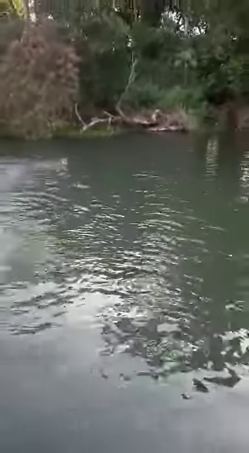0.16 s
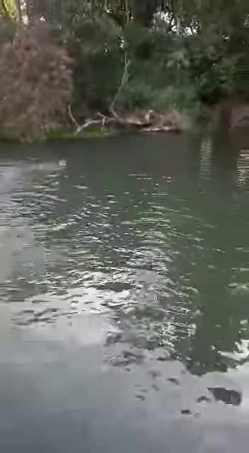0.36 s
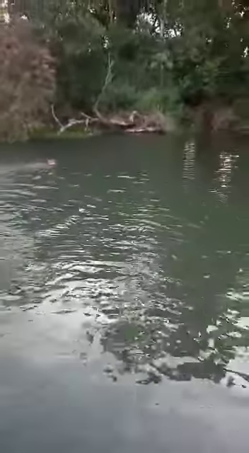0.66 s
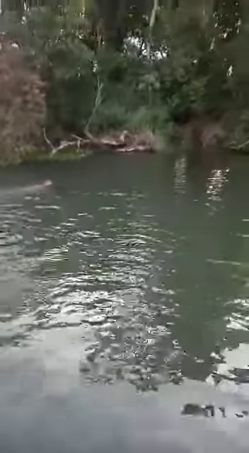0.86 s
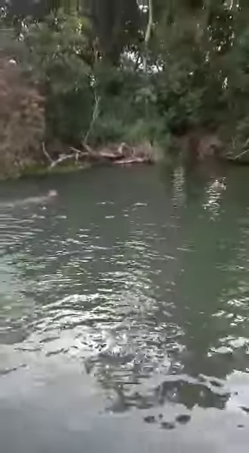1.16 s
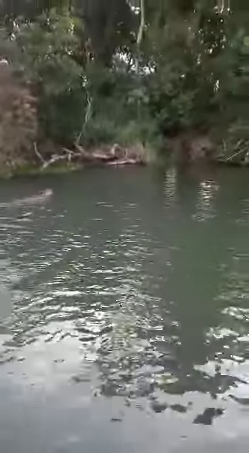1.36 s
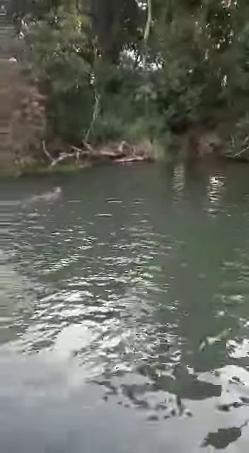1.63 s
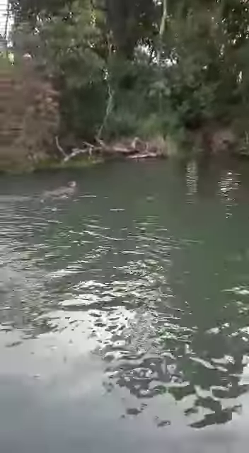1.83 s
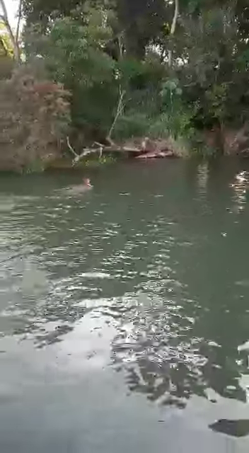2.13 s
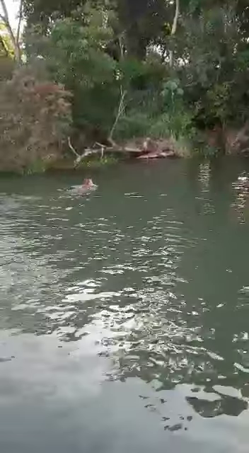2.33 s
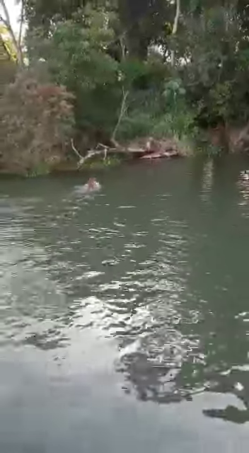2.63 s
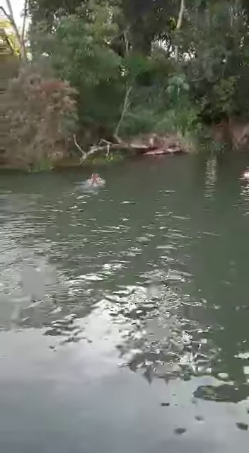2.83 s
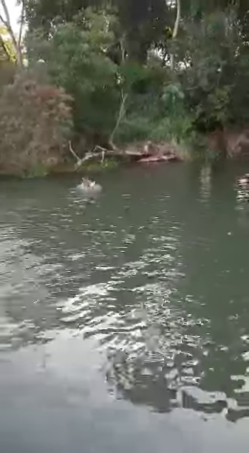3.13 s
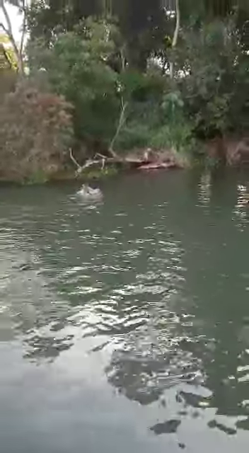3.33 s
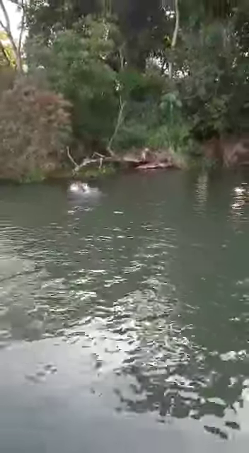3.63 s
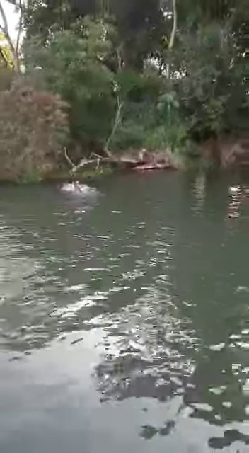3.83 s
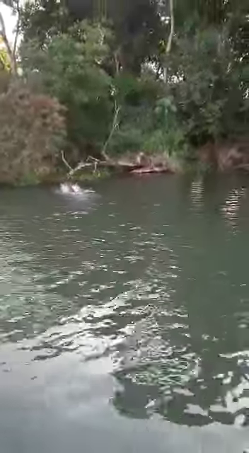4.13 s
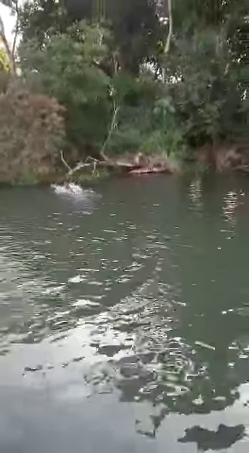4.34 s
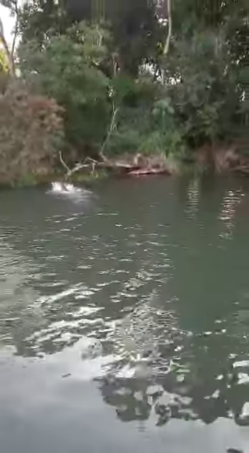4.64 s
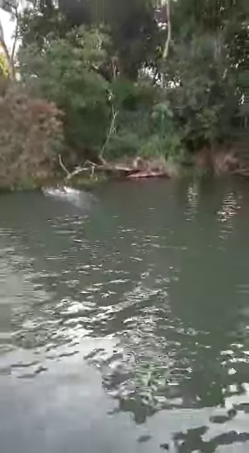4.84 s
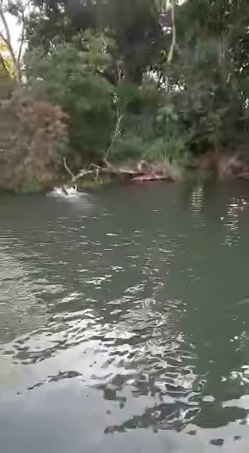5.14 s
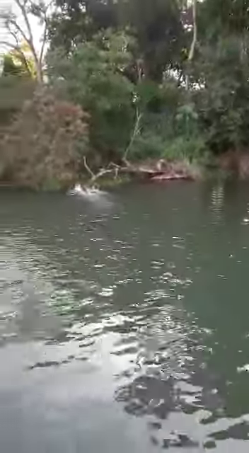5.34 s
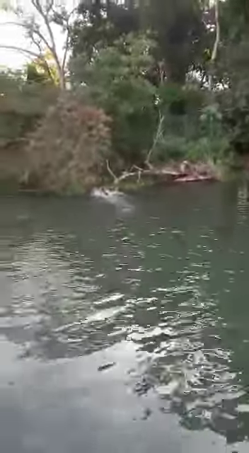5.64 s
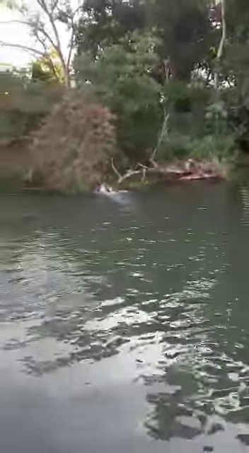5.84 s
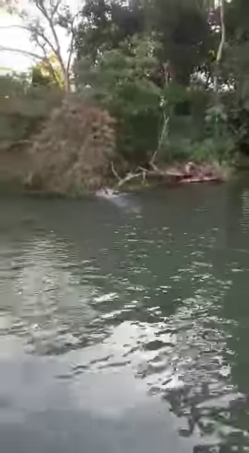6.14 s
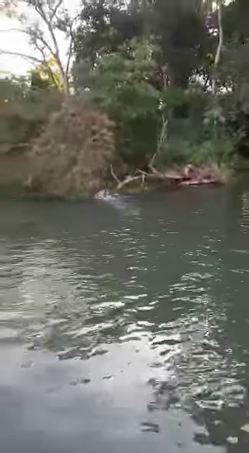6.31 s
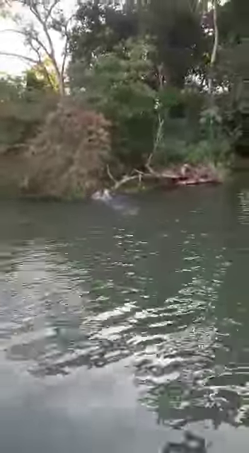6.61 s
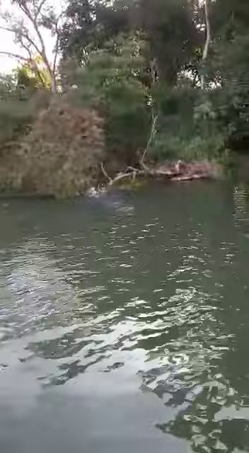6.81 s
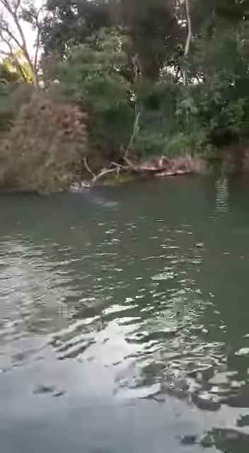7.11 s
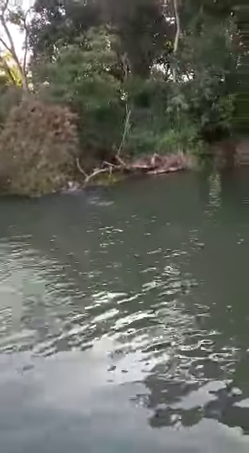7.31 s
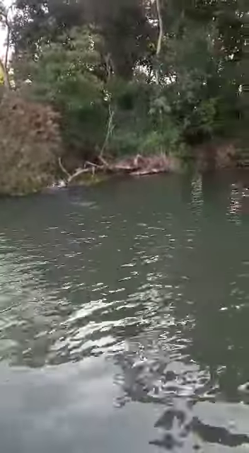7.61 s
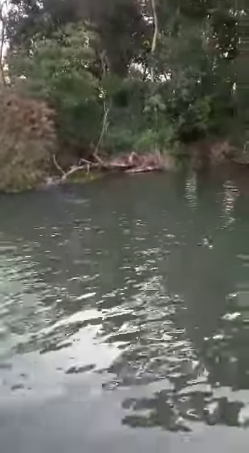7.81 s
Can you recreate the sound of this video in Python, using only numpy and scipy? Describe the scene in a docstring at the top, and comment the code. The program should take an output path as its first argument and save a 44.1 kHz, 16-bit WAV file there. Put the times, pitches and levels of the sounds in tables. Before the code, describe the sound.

Right at the start, a close, hollow knock rings on a boat hull. A second follows at about 0.5 seconds and bounces a few times; these two are the loudest sounds. From about 1 to 2 seconds, wind puffs against the microphone with low rumbles and soft thumps, over a few faint splashes and bubble plops. Around 2.3 seconds, a swimmer some way off begins churning the river. The splashing builds until about 4 seconds and then holds at a modest level to the end near 8 seconds: uneven strokes, small slaps, round gurgles, snapping drops and a steady fizz of spray. Wind thumps return near 2.4 seconds, more lightly around 4.5 and 5.5, and again from 7.4 seconds. Behind everything lie a very faint, high, even insect drone and a soft outdoor hiss.

```python
"""A river bank, with a swimmer some way off churning the water into gurgles, bubbles and fizz.
Each stroke shoves the water, and each slap traps a bubble of air that rings like a tiny bell.
Near the start, two knocks set a hollow hull ringing. Wind puffs at the opening of a small
microphone and makes it rumble, while insects sing high up over a faint hush."""
import sys
import numpy as np
from scipy import signal
from scipy.fft import rfft, irfft
from scipy.io import wavfile
from scipy.ndimage import uniform_filter1d

SR = 44100
rng = np.random.default_rng(int(sys.argv[2]) if len(sys.argv) > 2 else 0)


def store_pcm(level_fs):
    """Save levels as 16-bit WAV."""
    pcm = np.round(np.clip(level_fs, -1, 1) * 32767).astype(np.int16)
    wavfile.write(sys.argv[1], SR, np.atleast_2d(pcm).T)


N = 351344

# The churn builds as the swimmer gets going.
# Each row: time in seconds, fizz level in dB, extra gurgle in dB, extra spray in dB.
CHURN = [(0.4, -94, 8, 18), (0.7, -96.5, 7, -15), (1.95, -94.5, 10.5, -12), (2.24, -64, -8, -13),
         (2.32, -63.5, 0.5, -11), (2.6, -59, 3, -22.5), (3.1, -58.5, 4, -14.5), (3.6, -55, 6.5, -5.5),
         (4.1, -54, 4, -2.5), (5.0, -55, 6.5, -0.5), (5.9, -54.5, 4, -2), (6.4, -57.5, 5.5, -1.5),
         (6.7, -59, 9.5, -4), (7.0, -56, 3, -4), (7.96, -56, 2.5, -2)]
# The tone colour of splashing water. Each row: frequency in Hz, level in dB.
WATER_COLOUR = [(150, -27), (297, -16.5), (450, 4), (755, -4), (928, 1), (1160, -10), (1380, -8.5),
                (1560, -16.5), (1780, -11.5), (1960, -14), (2480, -7), (2950, -18), (3500, -26.5),
                (4250, -26.5), (4750, -17.5), (6500, -21.5), (7200, -35), (8000, -38.5), (10200, -32),
                (12000, -41.5), (15500, -51)]
# Swimming strokes. Each row: start in seconds, slosh level in dB, length in seconds, churn swell in dB.
STROKES = [(2.302, -93, 0.048, 7), (2.377, -59, 0.14, 5.5), (2.602, -68.5, 0.041, 4),
           (2.709, -88, 0.073, 2), (2.812, -58, 0.095, 2), (3.13, -62.5, 0.2, 2), (3.456, -67, 0.21, 1.5),
           (3.692, -63.5, 0.13, 2), (3.953, -64, 0.33, 3), (4.461, -57.5, 0.28, 2), (4.871, -80, 0.083, 3),
           (4.981, -54.5, 0.14, 3.5), (5.297, -62, 0.12, 3), (5.426, -54.5, 0.15, 4), (5.734, -57, 0.32, 3),
           (6.212, -59.5, 0.083, 2), (6.36, -61, 0.09, 1.5), (6.552, -56.5, 0.22, 1),
           (6.803, -59, 0.19, 0.5), (7.016, -56.5, 0.29, 2), (7.41, -56.5, 0.25, 3),
           (7.776, -57.5, 0.26, 0.5)]
# Spray thrown up by kicks. Each row: start in seconds, length in seconds, spray boost in dB.
KICKS = [(2.502, 0.066, 11.5), (2.614, 0.032, 14), (2.666, 0.034, 13.5), (2.85, 0.14, 7),
         (6.007, 0.025, 2.5), (6.707, 0.081, 4), (7.035, 0.09, 3.5)]
# Faint splashes before the churning.
# Each row: start in seconds, length in seconds, fizz level in dB, extra gurgle in dB, extra spray in dB.
FIRST_SPLASHES = [(0.382, 0.1, -84, -7, 15), (0.87, 0.085, -75.5, -6, 2.5), (1.18, 0.02, -72, -18, -27),
                  (1.254, 0.19, -98, -3, 20), (1.29, 0.097, -90, 35, 2), (1.704, 0.13, -69, -34, -9),
                  (1.995, 0.09, -66, -15, -18), (2.126, 0.043, -71.5, -25, -1)]
# Slaps that each trap a large bubble.
# Each row: start in seconds, level in dB, pitch in Hz, splash boost in dB, ring length in cycles.
SLAPS = [(1.277, -61, 600, -25, 18), (1.285, -61.5, 1053, -28, 22), (1.325, -51, 836, -25, 15),
         (1.334, -57, 570, -26, 16), (1.368, -64, 840, -29, 17), (2.331, -43, 950, -19, 6.1),
         (2.389, -50, 950, -17, 7), (2.467, -48, 427, -17, 9.4), (2.48, -45.5, 476, -9, 10),
         (2.701, -46, 467, -23, 9.9), (2.74, -44, 850, -12.5, 4.8), (2.764, -46, 980, -6.5, 5.6),
         (2.892, -45, 550, -4, 14), (3.13, -39, 370, -40, 3.8), (3.273, -47, 566, -3, 4.1),
         (3.465, -43.5, 502, -11, 5.3), (3.57, -37, 700, -17, 2.6), (3.631, -41, 750, -10, 5.9),
         (3.735, -44, 970, -23, 14), (3.966, -39, 407, -22, 6.6), (4.075, -44, 444, -4.5, 11),
         (4.139, -44, 960, -4, 10), (4.235, -50.5, 521, -8, 17), (4.449, -42.5, 445, -12, 4.7),
         (4.538, -43, 597, 0.5, 7.8), (4.575, -39.5, 680, -5.5, 7.9), (4.944, -40.5, 930, -30, 8.6),
         (4.995, -40.5, 435, -10, 8.6), (5.083, -41, 910, -16, 10), (5.33, -44.5, 569, -26, 13),
         (5.449, -38, 490, -16, 2.8), (5.757, -41, 440, -6, 8.5), (5.863, -34, 457, -13, 3.1),
         (6.218, -39, 443, -35, 6.1), (6.396, -37, 490, -27, 4.7), (6.44, -43.5, 485, -27, 12),
         (6.483, -42.5, 490, -24, 6.3), (6.506, -39.5, 990, -9, 2.8), (6.607, -48, 357, -25, 8.6),
         (6.687, -42.5, 507, -18, 6.5), (6.81, -52.5, 473, -22, 11), (6.918, -46.5, 535, -7, 5.8),
         (7.053, -42.5, 535, -6.5, 7.3), (7.079, -37.5, 500, -7, 3.7), (7.131, -37, 410, -15, 8.6),
         (7.149, -40.5, 360, -21, 13), (7.427, -38.5, 473, -5, 4.5), (7.458, -38, 450, -24, 5.1)]
# Drops that snap. Each row: start in seconds, level in dB, high ring boost in dB, crack boost in dB.
DROPS = [(0.401, -83, 10, 23.5), (2.4714, -57, -16, -14), (2.509, -46.5, -13, -11),
         (2.6028, -42.5, -19, -34), (2.677, -41, -3, -34), (3.209, -45.5, -12, -28),
         (3.714, -36.5, -8.5, -20), (4.063, -41, -19, -29), (6.014, -45, 4.5, -11), (7.08, -40, -16, -17),
         (7.615, -40, -17, -19)]
# Bright droplets. Each row: start in seconds, peak level in dB, pitch in Hz.
DROPLETS = [(1.723, -50, 2780), (1.802, -65, 1450), (1.906, -64, 5050), (1.933, -64, 4870),
            (2.052, -55, 5200), (2.26, -57, 5450), (2.532, -52, 5600), (2.5506, -46.5, 5130),
            (2.643, -54, 5400), (2.724, -54, 5330), (2.762, -59, 5800), (2.8565, -56, 4950),
            (2.884, -53, 4900), (2.9557, -50.5, 5180), (3.084, -64, 5080), (3.517, -52, 5500),
            (3.61, -51, 5570)]
# Knocks and their bounces. Each row: start in seconds, peak ring level in dB, tick level in dB.
KNOCKS = [(0.001, -20, -44), (0.022, -50, -49.5), (0.474, -47, -45.5), (0.482, -20, -46.5),
          (0.52, -32.5, -55), (0.547, -29.5, -56.5), (0.582, -39.5, -66)]
# The notes the hull rings with. Each row: pitch in Hz, level in dB, seconds to fade by 60 dB.
HULL_NOTES = [(122.8, -5, 0.42), (148.4, -2.5, 0.37), (174.8, -2, 0.36), (255, 6, 0.18), (282.8, 4, 0.15),
              (362.2, 5, 0.14), (386, 3, 0.11), (422, -2, 0.16), (552, -2, 0.11), (584, -12, 0.14),
              (714, -10, 0.1), (820, -24, 0.063), (1696, -16, 0.047), (2160, -14, 0.034), (2437, -21, .05)]
# The wind's rise and fall. Each row: time in seconds, level in dB, tilt towards higher rumble in dB.
GUSTS = [(0.2, -61, -4), (0.34, -53.5, -61), (0.62, -49, -8), (0.76, -53, -24.5), (0.92, -54.5, -2.5),
         (1.16, -47.5, -9.5), (1.56, -48.5, -20.5), (1.8, -40, -14), (2.02, -49.5, -25), (2.44, -67, -43),
         (2.6, -56.5, -58), (3.9, -48, -18), (4.8, -58, -34), (5.4, -49, -46), (6.6, -55.5, -30),
         (7.3, -57, -15), (7.46, -45.5, -8), (7.7, -51.5, -15), (7.96, -42.5, -17)]
# The tone colour of the wind. Each row: frequency in Hz, level in dB.
WIND_COLOUR = [(25, -14), (39, 0.5), (70, -1), (143, -6.5), (297, -26), (321, -36.5), (348, -29.5),
               (600, -79.5), (1320, -120)]
# Swirls of air that thump the microphone. Each row: start in seconds, level in dB, pitch in Hz.
PUFFS = [(0.982, -32.5, 116), (1.104, -26, 95), (1.162, -26.5, 134), (1.323, -32.5, 111), (1.368, -30, 164),
         (1.443, -36, 144), (1.782, -26.5, 117), (2.403, -29.5, 142), (2.429, -26, 112), (2.818, -36, 116),
         (4.575, -32.5, 181), (5.446, -34, 127), (7.441, -27.5, 95), (7.825, -30, 113)]
# Short lulls in the wind. Each row: end in seconds, length in seconds, level change in dB.
LULLS = [(2.36, 0.074, -35), (3.704, 0.099, -32), (3.823, 0.066, -22), (4.451, 0.21, -32),
         (5.716, 0.22, -12.5), (6.196, 0.14, -25), (6.531, 0.17, -16)]
# The tone colours of the insects and of the hush. Each row: frequency in Hz, level in dB.
INSECT_COLOUR = [(8770, -52), (8920, 0.5), (9760, 7.5), (10500, -2.5), (10800, -14.5), (11500, -15.5),
                 (15000, -82)]
HUSH_COLOUR = [(300, -8.5), (1100, -18), (1400, 15), (2500, 4), (3600, 3), (6000, 7), (8000, -0.5),
               (15500, 1.5)]


def churn():
    """The swimmer stirs up a noisy wash, with swarms of low, middle and high bubbles riding on it."""
    out = wash()
    fizz_db, gurgle_db, spray_db = churn_levels(np.arange(N) / SR)
    fizz_db = fizz_db - 16 * np.clip((-62 - fizz_db) / 10, 0, 1)  # faint water traps few bubbles
    out += swarm(fizz_db + gurgle_db - 15.5, 372.3, 1332, per_second=300, spread_db=7.5, cycles=9.2)
    out += swarm(fizz_db - 17, 1140, 3000, per_second=540, spread_db=2.5, cycles=2.2)
    out += swarm(fizz_db + spray_db - 10.5, 4540, 6160, per_second=500, spread_db=4, cycles=7.6)
    return filtered(out, "highpass", hz=330, order=6)


def churn_levels(t):
    """Strokes, kicks and splashes lift the water's sound. Gives fizz, extra gurgle and extra spray."""
    swell_db = sum(db * envelope(t, start, length) for start, _, length, db in STROKES)
    fizz_db, gurgle_db, spray_db = follow(CHURN, t)
    spray_db += sum(db * envelope(t, start, length, 0.0056, 0.059) for start, length, db in KICKS)
    # A stroke lifts the gurgle most and the spray least.
    parts = gain(fizz_db + swell_db + [0 * t, gurgle_db + swell_db, spray_db - 0.7 * swell_db])
    for start, length, db, low_db, high_db in FIRST_SPLASHES:
        parts += gain(db + np.array([[0], [low_db], [high_db]])) * envelope(t, start, length, 0.022, 0.023)
    fizz_db, low_db, high_db = 20 * np.log10(parts)
    return fizz_db, low_db - fizz_db, high_db - fizz_db


def wash():
    """Distant splashes blur into noise, with gurgle at the bottom and spray at the top."""
    hz, t = grid(size=512)
    fizz_db, gurgle_db, spray_db = churn_levels(t)
    low = np.clip(np.log2(1500 / (hz + 1)) * 2.05, 0, 1)
    high, top = above(hz, 3400, slope=1.24), above(hz, 7000, slope=12)
    change_db = fizz_db + low * (gurgle_db - 12.5) + high * (spray_db + 6.5)
    change_db += 0.5 * top * (fizz_db + spray_db + 66.5)  # the finest spray needs the strongest strokes
    # As through a noise suppressor, faint splashing is thinned to its lows and two narrow bands.
    faint = np.clip((-60 - fizz_db) / 12, 0, 1)
    bands = low + np.exp(-((hz - 2600) / 600) ** 4) + np.exp(-((hz - 5300) / 950) ** 4)
    change_db -= 12 * faint * np.clip(1 - bands, 0, 1)
    # The finest spray comes in spatters; while the water is faint, all the spray does.
    spatter = unit_level(smooth(smooth(rng.standard_normal(len(t)), 6), 4))
    change_db += spatter * (3.5 * above(hz, 11300, slope=5) + 5 * np.minimum(faint, 0.5) * high)
    # Thin, wavering streaks like a noise suppressor's warble, strongest while the water is faint.
    suppressor_streaks = unit_level(smooth(rng.standard_normal((len(t), len(hz))).T, 24))
    change_db += (2.5 + 6 * faint) * suppressor_streaks - 6 * faint
    crackle = np.clip((-54 - fizz_db) / 7, 0, 1)  # the churn crackles until it gets dense
    flicker_db = 1.1 - 0.29 * high + 0.29 * top + 2.34 * crackle
    return noise(WATER_COLOUR, change_db + 3.5, patchy_db=2.5 - 0.94 * high, flicker_db=flicker_db)


def swarm(level_db, low_hz, high_hz, per_second, spread_db, cycles):
    """Many small bubbles ring at random moments on ten pitches; a few are much louder."""
    out = np.zeros(N)
    for hz in np.geomspace(low_hz, high_hz, 10):
        when, luck = rng.random((int(per_second * N / SR / 10), 2)).T
        strength = gain(spread_db * np.minimum(-np.log(luck), 4))
        pops = np.bincount((when * N).astype(int), strength, N)
        pops *= gain(colour_db(WATER_COLOUR, hz)) * np.sqrt(hz)
        out += signal.oaconvolve(pops, blip(hz, cycles, glide=0.03, attack=0.18))[:N]
    return gain(level_db) * unit_level(out)


def slaps():
    """Each slap splashes and traps a large bubble, then a smaller one that rings higher."""
    out = np.zeros(N)
    for start, db, hz, splash_db, cycles in SLAPS:
        add(out, start, db, blip(hz, cycles, glide=0.02, attack=0.095))
        add(out, start + 0.0042, db - 20, blip(hz * rng.uniform(1.36, 1.8), 2.1 * cycles, glide=0.029))
        splash = crack(tilt_db=0.5, fade_s=0.017, tail_db=1, tail_s=0.2, rise_s=0.0026)
        add(out, start, db + splash_db - 1.5, splash)
    return out


def drops():
    """Falling drops snap with two rings and a bright crack; droplets give just one ring."""
    out = np.zeros(N)
    for start, db, high_db, crack_db in DROPS:
        add(out, start, db, roughen(blip(hz=2210, cycles=7.3, glide=0.045)))
        add(out, start, db + high_db, roughen(blip(hz=4900, cycles=7.2, glide=0.027)))
        snap = crack(tilt_db=17, fade_s=0.039, tail_db=-4, tail_s=0.059, rise_s=0.0007)
        add(out, start, db + crack_db - 2.5, snap)
    for start, db, hz in DROPLETS:
        add(out, start, db, roughen(blip(hz, cycles=11.7, glide=0.029, attack=0.21)))
    return out


def slosh():
    """Each stroke shoves a lump of water, which makes a low, uneven rush."""
    rush = filtered(rng.standard_normal(N), "bandpass", hz=(148, 288), order=3)
    flicker_db = 6.5 * unit_level(smooth(smooth(rng.standard_normal(N), 900), 900))
    t = np.arange(N) / SR
    level = sum(gain(db) * envelope(t, start, length) ** 2 for start, db, length, _ in STROKES)
    return level * unit_level(rush * gain(flicker_db))


def hull_knocks():
    """Each soft blow sets all the hull's notes ringing, with a little rattle and a short tick."""
    out, t = np.zeros(N), np.arange(SR // 2) / SR
    hz, db, fade_s = np.transpose(HULL_NOTES)[:, :, None]
    notes = (gain(db - 60 * t / fade_s) * np.sin(2 * np.pi * hz * t)).sum(0)
    notes *= 1 - np.exp(-t / 0.00091)  # a soft blow takes about a millisecond to build
    for start, peak_db, tick_db in KNOCKS:
        rattle = 0.029 * rng.standard_normal(4000) * np.exp(-t[:4000] / 0.028)
        ring = signal.oaconvolve(notes, signal.unit_impulse(4000) + rattle)
        add(out, start, peak_db, ring / abs(ring).max())
        tick = crack(tilt_db=2.8, fade_s=0.042, tail_db=-17.5, tail_s=0.25, rise_s=0.00096)
        add(out, start, tick_db, tick)
    return out


def wind():
    """Air swirling at the microphone's opening makes a lumpy rumble with lulls and single thumps."""
    hz, t = grid(size=1024)
    level_db, tilt_db = follow(GUSTS, t)
    for end, length, dip_db in LULLS:
        level_db += dip_db * envelope(t, end - length, length, rise_s=0.021, fall_s=0.01)
    octaves_up = np.clip(np.log2(hz / 120 + 1e-9), 0, 1.5)
    change_db = level_db + octaves_up * (tilt_db + 17.5)
    out = noise(WIND_COLOUR, change_db, patchy_db=1, flicker_db=5, size=1024, bins=2, frames=4)
    for start, db, pitch_hz in PUFFS:
        add(out, start, db - 3, blip(pitch_hz, cycles=1.88, glide=-0.044, attack=0.23))
    return out


def insects():
    """Many insects blend into one even, high band of noise."""
    return noise(INSECT_COLOUR, change_db=-76, patchy_db=1, flicker_db=1)


def hush():
    """A faint, steady hiss lies behind everything."""
    return noise(HUSH_COLOUR, change_db=-86.5, patchy_db=2, flicker_db=1)


def blip(hz, cycles, glide, attack=0.058):
    """A short, fading tone. With a glide above zero it climbs, like a bubble nearing the surface."""
    age = np.arange(int(3 * cycles * SR / hz) + 2) * hz / SR / cycles  # counted in ring lengths
    shape = (1 - np.exp(-age / attack)) ** 2 * np.exp(-2.5 * age)
    return shape / shape.max() * np.sin(2 * np.pi * cycles * (age + glide * age ** 2 / 2))


def crack(tilt_db, fade_s, tail_db, tail_s, rise_s):
    """A burst of water-coloured noise, tilted towards the treble, with a longer tail."""
    hz, t = np.fft.rfftfreq(8192, 1 / SR), np.arange(8192) / SR
    colour = gain(colour_db(WATER_COLOUR, hz) + tilt_db * np.log2(hz / 1000 + 0.066))
    hiss = irfft(rfft(rng.standard_normal(8192)) * colour)
    fade = gain(-60 * t / fade_s) + gain(tail_db - 60 * t / tail_s)
    return unit_level(hiss) * (1 - np.exp(-t / rise_s)) * fade


def roughen(tone):
    """Smears a tone with a few milliseconds of noise, like several drops landing at once."""
    out = np.convolve(tone, rng.standard_normal(300) * np.exp(-np.arange(300) / SR / 0.0016))
    return out / abs(out).max()


def noise(colour, change_db, patchy_db, flicker_db, size=512, bins=8, frames=8):
    """Coloured noise that flickers as a whole and in patches, `bins` wide and `frames` long."""
    hz, t = grid(size)
    real, imaginary, patches = rng.standard_normal((len(t), len(hz), 3)).T
    patches = unit_level(smooth(smooth(patches, bins, axis=0), frames))
    flicker = unit_level(smooth(rng.standard_normal(len(t)), 3))
    shape_db = colour_db(colour, hz) + patchy_db * patches + flicker_db * flicker
    spectra = (real + 1j * imaginary) * gain(shape_db)
    play = lambda z: signal.istft(z, nperseg=size, noverlap=3 * size // 4)[1][:N]
    return play(spectra * gain(change_db)) / np.std(play(spectra))


def grid(size):
    """The frequencies and times for building sound from overlapping frames of `size` samples."""
    return np.fft.rfftfreq(size, 1 / SR)[:, None], np.arange(4 * N // size + 5) * size / 4 / SR


def envelope(t, start, length, rise_s=0.013, fall_s=0.037):
    """Rises from 0 towards 1 at the start, and falls back once the length has passed."""
    return np.clip(np.minimum((t - start) / rise_s, 1 + (start + length - t) / fall_s), 0, 1)


def above(hz, edge_hz, slope):
    """0 below the edge, then climbing by `slope` each octave until it reaches 1."""
    return np.clip(np.log2((hz + 1) / edge_hz) * slope, 0, 1)


def colour_db(colour, hz):
    """Reads a tone colour table at any frequency."""
    row_hz, db = np.transpose(colour)
    return np.interp(np.log(hz + 1), np.log(row_hz + 1), db)


def follow(table, t):
    """Reads the level columns of a table at the times t."""
    times, *columns = np.transpose(table)
    return [np.interp(t, times, column) for column in columns]


def add(mix, start, db, sound):
    part = mix[round(start * SR):][:len(sound)]
    part += gain(db) * sound[:len(part)]


def filtered(x, kind, hz, order):
    return signal.sosfilt(signal.butter(order, hz, kind, fs=SR, output="sos"), x)


def smooth(x, width, axis=-1):
    return uniform_filter1d(x, width, axis=axis)


def unit_level(x):
    return x / np.sqrt(np.mean(x ** 2) + 1e-20)


def gain(db):
    return 10 ** (np.asarray(db) / 20)


def scene():
    """All the sounds of the river bank, added into one channel."""
    return (churn() + wind() + hull_knocks() + slosh() + slaps() + drops() + insects() + hush())[None]


def record(dry):
    """The microphone's small opening loses the deepest bass; then the highest treble is cut off."""
    lean = filtered(dry, "highpass", hz=53, order=4)
    treble_cut = signal.firwin(1023, 15700, window=("kaiser", 9), fs=SR)
    return signal.oaconvolve(lean, treble_cut[None], "same")


dry = scene()
out = record(dry)
store_pcm(out)
```